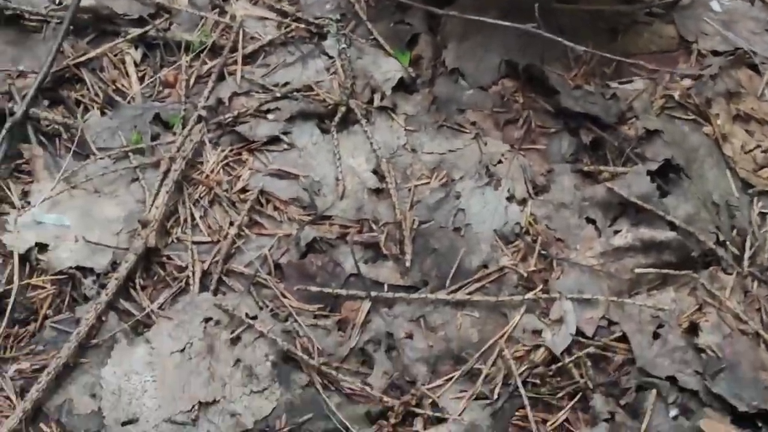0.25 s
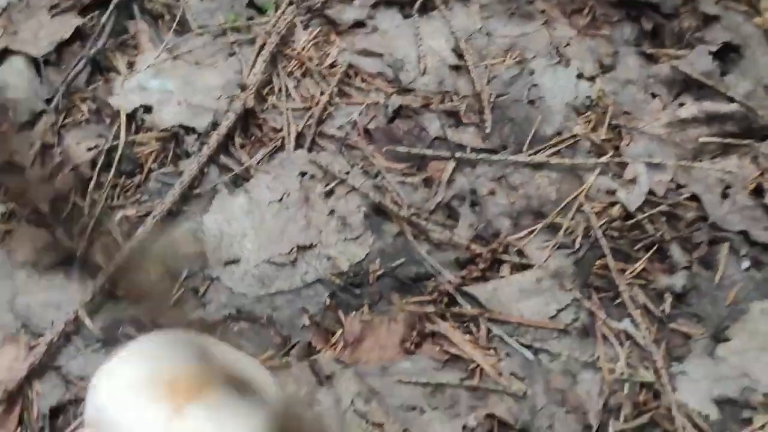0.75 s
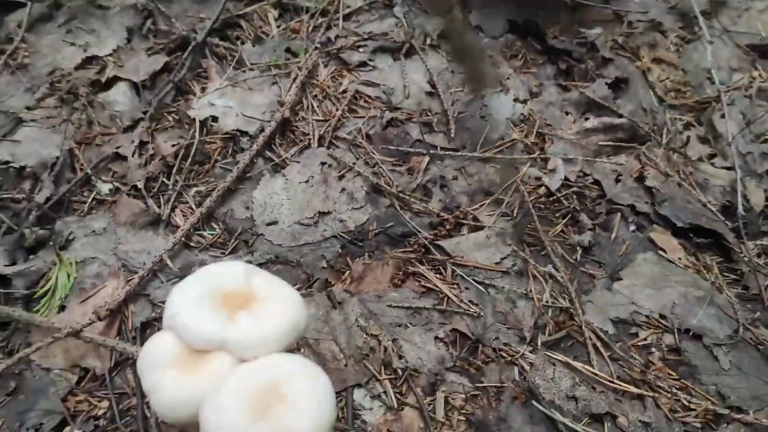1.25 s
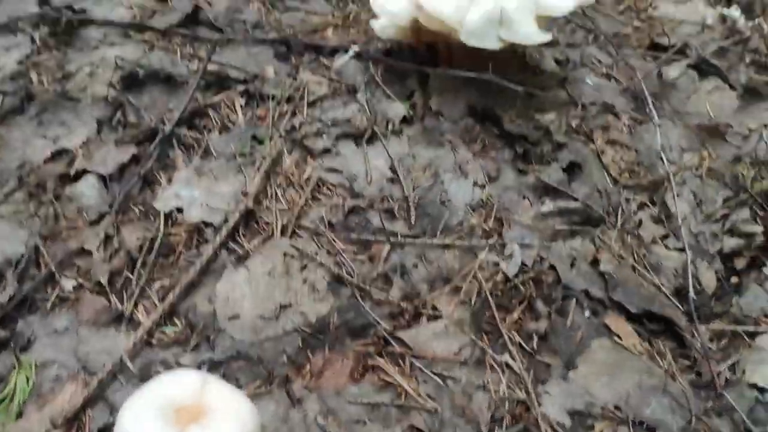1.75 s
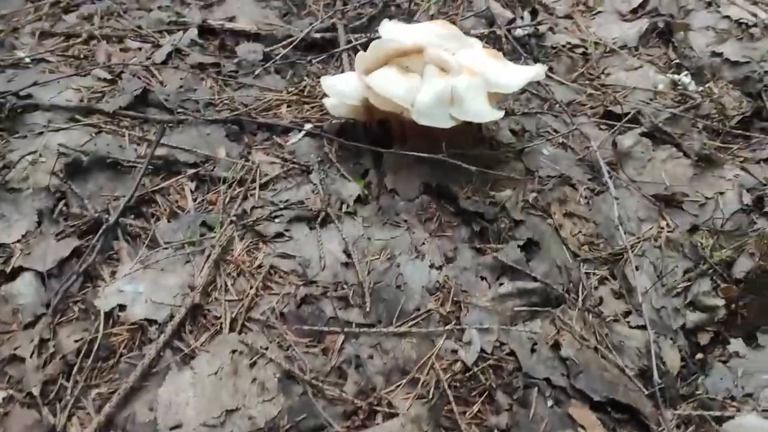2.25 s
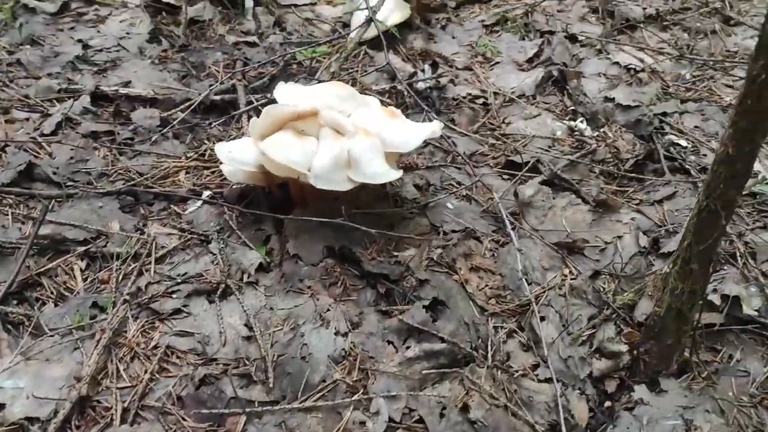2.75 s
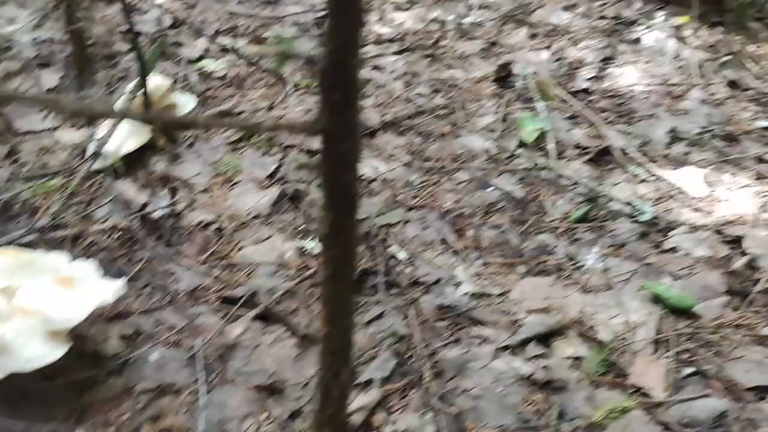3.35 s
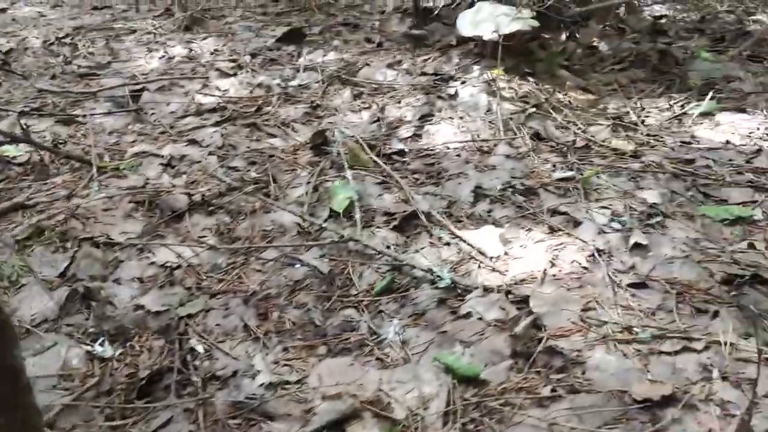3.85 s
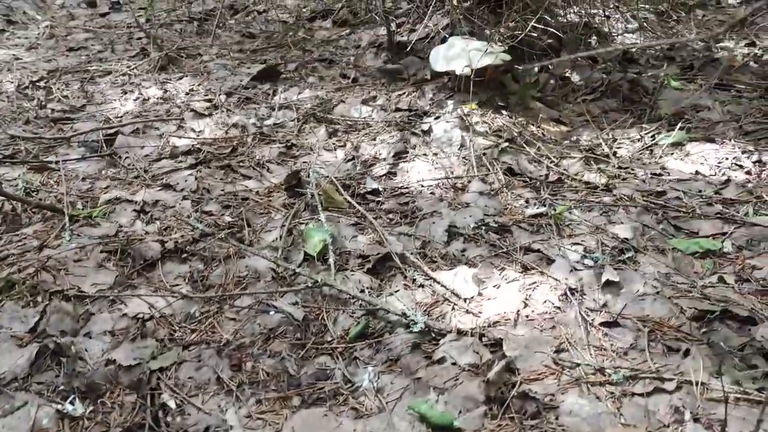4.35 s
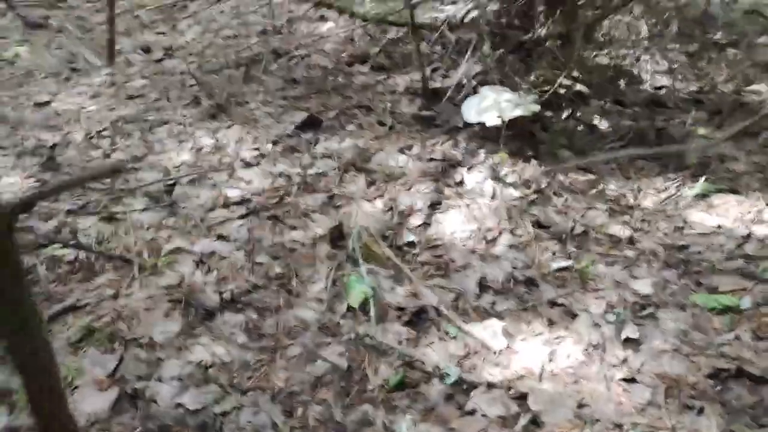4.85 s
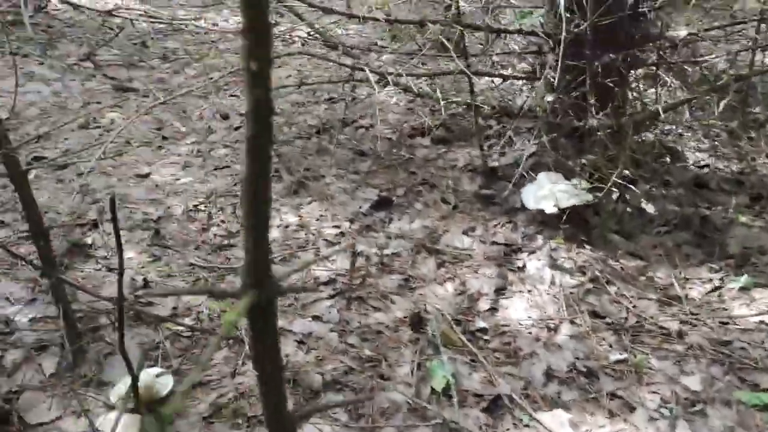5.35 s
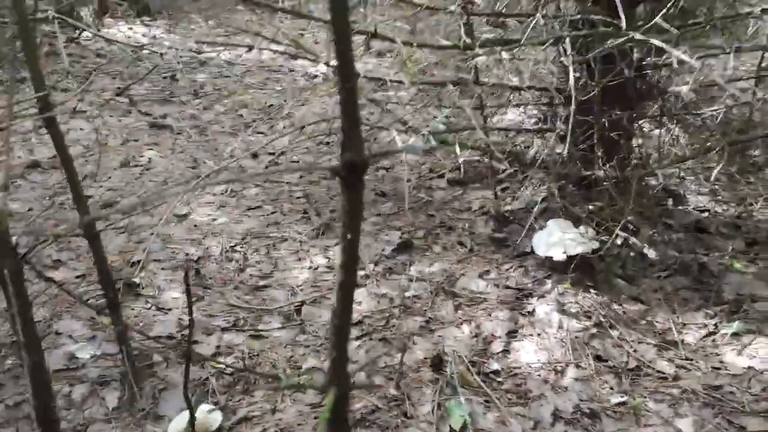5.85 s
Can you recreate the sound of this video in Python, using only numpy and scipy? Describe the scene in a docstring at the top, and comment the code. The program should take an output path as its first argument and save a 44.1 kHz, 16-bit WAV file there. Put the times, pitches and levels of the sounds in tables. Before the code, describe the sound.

Slow footsteps crunch over dry leaves with sharp twig snaps close by, while small birds whistle faintly far off among echoing trees.

```python
"""Steps over forest litter

Slow steps over dry leaves and twigs, with a hand-held phone. Presses swell dense crackle made of tiny
ringing breaks; soles scuff in fracture bursts and rub in noisy glides, twigs snap as band-shaped cracks.
Damped low sines give dull knocks. Small birds whistle far off as gliding sines with echoes among the
trunks, over the quiet rush of the forest, made of shaped noise."""
import sys
import numpy as np
from scipy import signal
from scipy.fft import rfft, irfft, next_fast_len
from scipy.io import wavfile
from scipy.ndimage import map_coordinates

SR = 44100
rng = np.random.default_rng(int(sys.argv[2]) if len(sys.argv) > 2 else 0)


def unload_wav(signal):
    """Save mono or channel-first audio to the path in sys.argv[1] as 16-bit WAV at rate SR, clipped to [-1, 1]."""
    wavfile.write(
        sys.argv[1],
        SR,
        np.round(np.clip(np.atleast_2d(signal).T, -1, 1) * 32767).astype(np.int16),
    )


N = 269270

# left-right likeness of leaf and twig sounds: freq_hz, correlation
LEAF_LIKENESS = [(300, 0.996), (700, 0.82), (1500, -0.15), (8000, 0.058)]


def amp(db):
    """Decibels to gain."""
    return 10 ** (np.asarray(db) / 20)


def unit(x):
    """Scale to rms 1."""
    return x / np.sqrt(np.mean(x ** 2) + 1e-20)


def along(points, hz):
    """(Hz, value) points read on a log frequency axis."""
    f, v = np.transpose(points)
    return np.interp(np.log(hz + 1), np.log(f + 1), v)


def wobble(rate, size=N):
    """A smooth random curve, rate knots a second."""
    knots = rng.standard_normal(int(size * rate / SR) + 4)
    return map_coordinates(knots, [np.arange(size) * rate / SR])


def swell(size):
    """Rounded rise and fall: the root of a half sine."""
    return np.abs(np.sin(np.pi * np.linspace(0, 1, size))) ** .5


def filtered(x, response):
    """x times a response of frequency."""
    size = x.shape[-1]
    m = next_fast_len(size + 4096)
    return irfft(rfft(x, m) * response(np.fft.rfftfreq(m, 1 / SR)), m)[..., :size]


def band(x, hz, octaves, order=1):
    """A causal band-pass reaching octaves to each side of hz."""
    edges = np.clip([hz / 2 ** octaves, hz * 2 ** octaves], 20, SR * .48)
    return signal.sosfilt(signal.butter(order, edges, 'band', fs=SR, output='sos'), x)


def add(track, s, sound, pan_db):
    """Mix a sound in at time s; positive pan_db leans left."""
    start = max(0, round(s * SR))
    gains = unit(amp([[pan_db / 2], [-pan_db / 2]]))
    piece = (sound * gains)[:, :N - start]
    track[:, start:start + piece.shape[1]] += piece


def spread(pair, alike):
    """Two unrelated signals become left and right with a given likeness."""
    turn = lambda hz: np.arccos(np.clip(along(alike, hz), -1, 1)) / 2
    mid, side = filtered(pair, lambda hz: np.array([np.cos(turn(hz)), np.sin(turn(hz))]))
    return np.array([mid + side, mid - side])


def fractures(size, rate, scatter_db, rub, cycles=4.1, low_hz=600, high_hz=14000):
    """Tiny leaf breaks, rate a second, each ringing briefly at its own pitch, over smooth rubbing noise."""
    count = int(size * rate / SR) + 1
    when, height, chance, *phases = rng.random((count, 5)).T[:, :, None]
    hz = low_hz * (high_hz / low_hz) ** height
    strength = hz * amp(scatter_db * np.minimum(-np.log(1 - chance), 4))
    k = np.arange(192)  # samples of ring
    ring = strength * np.exp(-k * hz / (SR * cycles))
    places = ((when * size).astype(int) + k).ravel()
    # left and right get each break in a different phase
    turns = [(2 * np.pi * (hz * k / SR + phase)).astype(np.float32) for phase in phases]
    grains = np.array([np.bincount(places, (ring * np.sin(turn)).ravel(), size)[:size] for turn in turns])
    return unit(unit(grains) + rub * rng.standard_normal((2, size)))


def press_gains():
    """Leaf mat and top leaf gains: stirring between presses, plus the power of each foot press."""
    # litter stirring under the feet: time_s, stir_level_db
    stirring = [(0.0, -59.5), (0.59, -55.5), (1.21, -64), (1.73, -61), (1.92, -70), (3.5, -56.5),
                (4.2, -69), (4.66, -59.5), (4.93, -53), (5.45, -56), (6.11, -59.5)]
    # feet loading the litter: full_weight_s, length_s, mat_db, crisp_db
    presses = [(.005, 0.035, -46, -55), (0.354, 0.14, -46, -48.5), (0.455, 0.027, -49.5, -65),
               (0.72, 0.036, -48, -70), (0.836, 0.053, -47.5, -53.5), (1.001, 0.054, -43.5, -53),
               (1.635, 0.11, -51, -49.5), (1.813, 0.1, -54.5, -56), (3.465, 0.087, -52.5, -78),
               (4.683, 0.059, -59, -53), (4.849, 0.12, -49, -57), (4.978, 0.096, -46, -40.5),
               (5.104, 0.072, -58, -46.5), (5.315, 0.15, -49, -42), (5.546, 0.18, -54, -54.5),
               (5.711, 0.32, -66, -53.5)]
    still_db, growth = -63, 1.2  # stir level at rest; dB of crackle per dB of stir
    mat_rest_db, crisp_rest_db = -63, -67
    rise_share, top_shape = 0.3, 1.7  # share of a press spent loading; roundness of its top
    t = np.arange(N) / SR
    stir = amp(growth * (np.interp(t, *np.transpose(stirring)) - still_db))
    power = (amp([[mat_rest_db], [crisp_rest_db]]) * stir) ** 2
    for s, length, mat_db, crisp_db in presses:
        u = np.maximum((s - t) / rise_share, (t - s) / (1 - rise_share)) / length
        power = power + (amp([[mat_db], [crisp_db]]) * np.exp(-np.abs(u) ** top_shape)) ** 2
    return np.sqrt(power)


def litter():
    """Dense leaf mat crunch with single needle ticks, under high, sparser crackle of dry top leaves."""
    # leaf mat spectrum: freq_hz, relative_db
    mat_spectrum = [(80, 1), (500, 2), (1200, -0.5), (2200, 5.5), (3500, 0), (7000, -4.5), (15000, -27)]
    # dry top leaf spectrum: freq_hz, relative_db
    crisp_spectrum = [(1000, -27), (3000, -6), (6000, 6), (10000, 6.5), (15000, -8.5)]
    needle_db = -6.5  # against the mat
    mat_gain, crisp_gain = press_gains()
    clumps = wobble(70)  # leaves give way in small groups
    crunch = fractures(N, rate=1500, scatter_db=1.0, rub=1.0, cycles=4.0, low_hz=392.5)
    mat = filtered(spread(crunch, LEAF_LIKENESS), lambda hz: amp(along(mat_spectrum, hz)))
    crackle = fractures(N, rate=870, scatter_db=2.0, rub=1.0, cycles=0.28, low_hz=3040)
    crisp = filtered(crackle, lambda hz: amp(along(crisp_spectrum, hz)))
    ticks = fractures(N, rate=97, scatter_db=1.0, rub=0, cycles=1.5, low_hz=693, high_hz=3860)
    needles = unit(spread(ticks, LEAF_LIKENESS))
    low_layer = unit(mat) * amp(2.13 * clumps) + amp(needle_db) * needles
    high_layer = unit(crisp) * amp(2.3 * clumps)
    return low_layer * mat_gain + high_layer * crisp_gain


def scrape(length, hz, octaves):
    """A quick run of fractures that swells and fades."""
    size = int(length * SR)
    grains = spread(fractures(size, rate=4000, scatter_db=1.5, rub=1.0), LEAF_LIKENESS)
    return unit(band(grains, hz, octaves, order=2) * swell(size))


def scuffs():
    """A sole drags the leaves, then tears them; soft soil gives way dully under the heaviest step."""
    # soles scraping leaves: start_s, length_s, level_db, centre_hz, octaves_each_side, tear_db, left_right_db
    scrapes = [(0.295, 0.035, -47.5, 1380, 0.66, -63.5, 5), (0.33, 0.038, -41.5, 1870, 0.49, -63, 4),
               (0.656, 0.064, -56.5, 930, 0.29, -67, -1), (0.981, 0.036, -45.5, 1590, 2.2, -42.5, -5),
               (2.525, .026, -37, 1760, 1.22, -34, -7), (3.497, 0.015, -42, 600, 1.3, -51, -1),
               (3.517, 0.019, -51, 6150, 0.122, -57, 9.5), (4.69, 0.042, -42, 2160, 1.12, -56, 29),
               (4.744, 0.021, -43.5, 4560, 0.92, -38.5, 24), (4.8898, .012, -41, 2290, 1.2, -40.5, 1),
               (4.948, 0.087, -42.5, 3100, 0.39, -62, 0), (5.023, 0.18, -47.5, 960, 1.24, -55.5, 0.5),
               (5.296, 0.0069, -28.5, 3330, 1.8, -45, 4)]
    tear_hz, tear_octaves, tear_lag = 7340, 0.59, 0.37  # lag as a share of the length
    soil_s, soil_length_s, soil_db, soil_hz = 5.0, 1.0, -60.5, 274
    out = np.zeros((2, N))
    for s, length, db, hz, octaves, tear_db, pan_db in scrapes:
        add(out, s, amp(db) * scrape(length, hz, octaves), pan_db)
        tear = scrape(length, tear_hz, tear_octaves)
        add(out, s + tear_lag * length, amp(tear_db) * tear, pan_db)
    add(out, soil_s, amp(soil_db) * scrape(soil_length_s, soil_hz, octaves=1.0), 0)
    return out


def progress(length):
    """Runs from 0 to 1 through a note or rub of length seconds."""
    return np.linspace(0, 1, int(length * SR))


def glide(length, first, middle, last):
    """A smooth (parabolic) pitch path through three points."""
    u = progress(length)
    return first + (last - first) * u + 4 * u * (1 - u) * (middle - (first + last) / 2)


def rubs():
    """A sole slides with a hoarse, narrow rasp or brief squeak: a gliding tone with random amplitudes."""
    # sliding soles: start_s, length_s, level_db, first_hz, middle_hz, last_hz
    slides = [(4.814, 0.066, -47, 1060, 1268, 1140), (4.917, 0.14, -48, 1033, 1330, 957),
              (5.32, .012, -44, 3250, 3340, 3300), (5.358, 0.0083, -44.5, 3450, 3380, 3300)]
    knots_per_s, pan_db = 300, 3  # hoarseness; left-right
    out = np.zeros((2, N))
    for s, length, db, *path in slides:
        phase = 2 * np.pi * np.cumsum(glide(length, *path)) / SR
        size = len(phase)
        rasp = np.array([wobble(knots_per_s, size) * np.sin(phase)
                         + wobble(knots_per_s, size) * np.cos(phase) for _ in range(2)])
        add(out, s, amp(db) * unit(spread(rasp, LEAF_LIKENESS) * swell(size)), pan_db)
    return out


def snaps():
    """A twig breaks in a sharp crack with a brief decaying ring and broad splintering."""
    # breaking twigs and stalks: start_s, starting_level_db, centre_hz, left_right_db, t60_s
    breaks = [(0.0505, -14, 3070, -37, 0.0068), (0.237, -42, 1720, 2.5, 0.032),
              (.305, -34.5, 950, 0.5, 0.033), (0.3358, -31, 1830, 2, 0.012),
              (.5657, -30.5, 8900, -24, 0.0043), (.741, -25.5, 7300, -2, 0.015),
              (1.0, -22, 6630, -16, .003), (1.0105, -21.5, 5400, -17, 0.0047),
              (1.0147, -24, 7200, -12, 0.0045), (1.0258, -24, 6000, -8, .003),
              (1.284, -41.5, 1190, -1, 0.0256), (1.3222, -35.5, 5730, 3, 0.0036),
              (1.506, -39.5, 830, 0, 0.029), (2.459, -38, 7500, 3, 0.017), (2.55, -16, 5860, -12, 0.00604),
              (2.5508, -26.5, 1980, -11, 0.031), (2.5543, -12, 6040, -5, 0.0026),
              (3.4942, -27, 680, 1, 0.0038), (3.5061, -37, 6040, 6, 0.017),
              (4.759, -16.5, 6540, 18, 0.0044), (4.766, -28, 6000, 16, 0.0033),
              (4.838, -33, 2300, 4, 0.0062), (4.864, -30, 2420, 4, 0.0058), (5.012, -20.5, 6660, 3, 0.008),
              (5.0422, -30, 2000, 0, .006), (5.1038, -32.5, 1870, -3, 0.0052),
              (5.2837, -30, 5760, 9, 0.0088), (5.2996, -32, 4890, 14, 0.0061),
              (5.578, -37, 1880, -2, 0.013), (5.738, -38.5, 4400, 8, 0.024), (5.74, -39, 1010, 0, 0.0286),
              (5.843, -36.5, 9300, -5, .0055), (5.953, -36, 1100, -4, 0.0186)]
    out, t = np.zeros((2, N)), np.arange(SR // 16) / SR
    for s, db, hz, pan_db, t60 in breaks:
        decay = amp(-60 * t / t60)
        fibres = rfft(spread(rng.standard_normal((2, len(t))) * decay, LEAF_LIKENESS))
        # keep only the phases: tearing fibres excite all frequencies evenly
        tear = irfft(np.exp(1j * np.angle(fibres)), len(t)) * decay ** .2
        body = unit(band(tear, hz, 0.65, order=4))
        ring = unit(band(np.sin(2 * np.pi * hz * t) * decay, hz, 1.0, order=2))
        splinters = unit(band(tear, 3300, 1.396, order=2))
        crack = unit(body + 0.39 * ring + 0.54 * splinters)
        add(out, s, amp(db) * crack * np.sqrt(np.mean(decay ** 2)), pan_db)
    return out


def knocks():
    """The ground answers with a dull, heavily damped sine push."""
    # ground knocks: start_s, peak_db_before_pan, pitch_hz, left_right_db
    thuds = [(2.562, -31, 140, -29), (3.127, -44.5, 208, 3), (3.503, -42, 160, 1), (4.892, -46.5, 241, 5),
             (5.792, -44.5, 222, 1.5)]
    out, t = np.zeros((2, N)), np.arange(SR // 10) / SR
    for s, db, hz, pan_db in thuds:
        push = np.sin(2 * np.pi * hz * t) * t * np.exp(-t / 0.002)
        add(out, s, amp(db) * push / np.abs(push).max(), pan_db)
    return out


def trunks(x, t60):
    """Scattered answers from the tree trunks: convolution with decaying noise."""
    t = np.arange(SR) / SR
    tail = rng.standard_normal((2, SR)) * amp(-60 * t / t60) * (1 - np.exp(-t / 0.0029))
    return signal.fftconvolve(x, tail / np.linalg.norm(tail[0]), axes=1)[:, :N]


def sing(pitch, quaver_hz, second=0):
    """One note on a pitch contour, with a random quaver and perhaps a second voice at 1.14 times the pitch."""
    size = len(pitch)
    phase = 2 * np.pi * np.cumsum(pitch + quaver_hz * wobble(398.5, size)) / SR
    loudness = swell(size) * amp(1.8 * wobble(68, size))
    return unit(loudness * (np.sin(phase) + second * np.sin(1.14 * phase)))


def birds():
    """A warble of quick slurs, thin high calls and an arched two-voiced whistle, each with forest echo."""
    # warbler's slurred notes: start_s, length_s, level_db, first_hz, middle_hz, last_hz
    slurs = [(0, 0.042, -45.5, 4850, 4760, 3890), (.125, 0.034, -46, 5670, 5180, 5300),
             (0.193, 0.067, -50, 5350, 4740, 4250), (0.357, 0.067, -47.5, 5250, 4630, 4310),
             (.415, 0.035, -46, 4360, 5070, 5940), (0.519, 0.03, -50.5, 6950, 6930, 6560),
             (0.539, 0.032, -48, 6700, 5150, 4600), (0.581, 0.038, -51, 4890, 4270, 3550),
             (0.805, 0.039, -49.5, 6000, 6470, 6800), (0.843, 0.055, -51.5, 6300, 4650, 4300),
             (1.029, .03, -47, 6120, 6550, 5640), (1.071, 0.035, -49, 5750, 4610, 4380),
             (1.147, 0.069, -53, 4650, 4020, 3570), (1.351, 0.035, -49, 5923, 6310, 7360),
             (1.376, 0.017, -48.5, 6480, 4658, 4080), (1.394, .045, -49.5, 4190, 4800, 5400),
             (1.491, 0.047, -47.5, 4124, 4780, 5530), (1.663, 0.022, -48.5, 6190, 6510, 6495),
             (1.685, 0.012, -48, 6257, 4860, 4150), (1.697, 0.049, -52, 4310, 3990, 3530)]
    # second bird: start_s, length_s, level_db, top_hz, share_before_top, pitch_share_lost_at_start
    high_calls = [(0.049, 0.064, -47, 7460, 0.84, 0.033), (0.178, 0.091, -49, 7430, 0.62, 0.034),
                  (2.454, .099, -53, 7520, 0.74, .0375), (2.599, .11, -49, 7490, .53, 0.0427),
                  (2.81, 0.13, -49, 6580, 0.6, 0.2)]
    # third bird: start_s, length_s, level_db, reference_hz, share_before_top, pitch_drop_share, second_voice_db
    arched = [(2.935, .19, -57.5, 3950, .15, .07, -10), (3.228, .32, -55, 4220, .31, .11, -15),
              (3.72, .36, -55.5, 4020, .39, .08, -8), (4.235, .34, -56, 4050, .25, .095, -5)]
    # whistle contour: place (-1 start, 0 top, 1 end), share_of_pitch_drop
    arch_shape = [(-1, 1), (-.55, 0.63), (0.011, 0.18), (0.4, 0.27), (0.34, 0.68), (.72, .82), (0.98, 1)]
    # the phone turns past the warble and calls: time_s, left_right_db
    turning = [(1.8, -3.5), (2.5, 6.5)]
    # arrival of warble, calls, whistles: straight_path_db, nearby_trunks_db, deep_forest_db
    paths = [(-8.5, -4.5, -3), (-5.5, -3, -8), (-6, -9.5, -12.5)]
    whistle_pan_db, near_t60_s, far_t60_s = 7.5, 0.25, 1
    warble, calls, whistles = np.zeros((3, 2, N))
    bearing = lambda s: np.interp(s, *np.transpose(turning))
    for s, length, db, *path in slurs:
        add(warble, s, amp(db) * sing(glide(length, *path), quaver_hz=85), bearing(s))
    for s, length, db, hz, top, depth in high_calls:
        arch = 1 - depth * (progress(length) / top - 1) ** 2
        add(calls, s, amp(db) * sing(hz * arch, quaver_hz=50.3), bearing(s))
    for s, length, db, hz, top, depth, second_db in arched:
        place = np.interp(progress(length), [0, top, 1], [-1, 0, 1])
        arch = 1 - depth * np.interp(place, *np.transpose(arch_shape))
        note = sing(hz * arch, quaver_hz=40, second=amp(second_db))
        add(whistles, s, amp(db) * note, whistle_pan_db)
    out = np.zeros((2, N))
    for song, (direct_db, near_db, far_db) in zip((warble, calls, whistles), paths):
        out += amp(direct_db) * song
        out += amp(near_db) * trunks(song, near_t60_s)
        out += amp(far_db) * trunks(song, far_t60_s)
    return out


def air():
    """The rush of the forest over a low rumble: shaped noise with a slight random level drift."""
    # forest air spectrum: freq_hz, relative_db
    spectrum = [(12, -12), (25, 3.5), (75, 1.5), (150, -7.5), (550, -9.5), (1200, -15.5), (7000, -20),
                (15000, -35)]
    # left-right likeness of the air: freq_hz, correlation
    likeness = [(25, 0), (70, 0.43), (250, 0.49), (600, 0.444), (1300, 0), (3000, 0.14)]
    noise = spread(rng.standard_normal((2, N)), likeness)
    rush = filtered(noise, lambda hz: amp(along(spectrum, hz)))
    return unit(rush) * amp(-55.0 + 1.0 * wobble(4.36))


def scene():
    """Near steps with a faint trunk echo, far birds and the forest air."""
    steps = litter() + scuffs() + rubs() + snaps() + knocks()
    echo = amp(-21) * trunks(steps, t60=.3)
    return steps + echo + birds() + air()


def record(dry):
    """Overall tone: a step down above 8 kHz, uneven top treble, nothing above 15.8 kHz."""
    # overall treble response: freq_hz, gain_db
    treble = [(7300, 0), (8300, -12), (9200, -16), (14000, 2), (14700, -17), (15800, 1)]
    top_hz = 15800
    return filtered(dry, lambda hz: amp(along(treble, hz)) * (hz < top_hz))


dry = scene()
out = record(dry)
unload_wav(out)
```